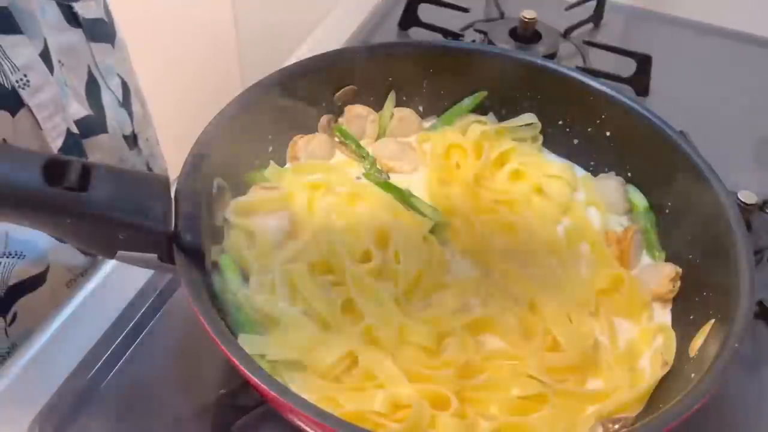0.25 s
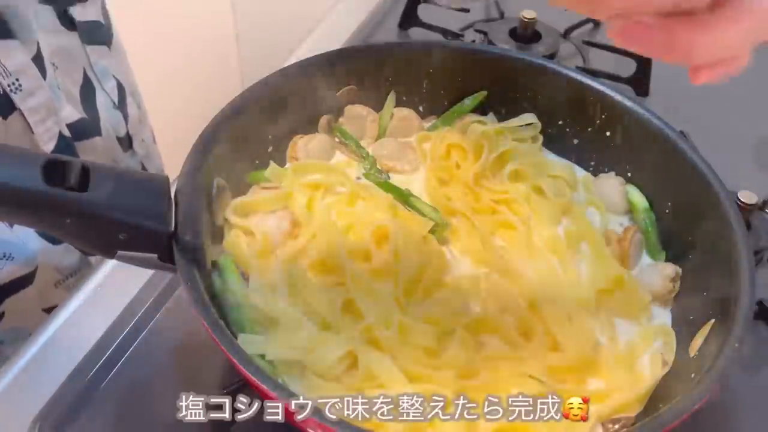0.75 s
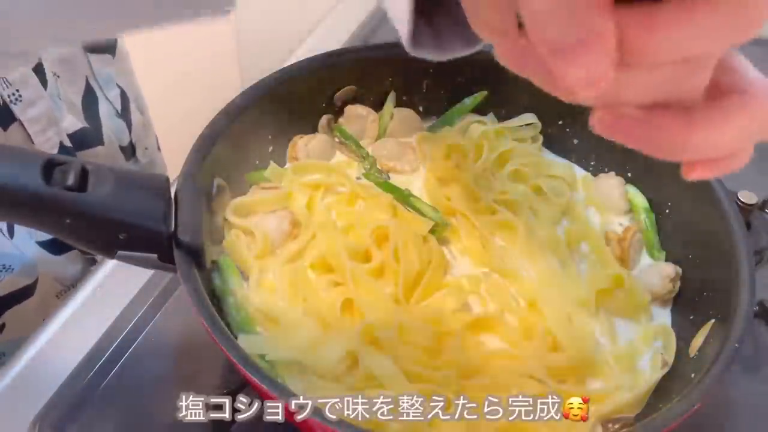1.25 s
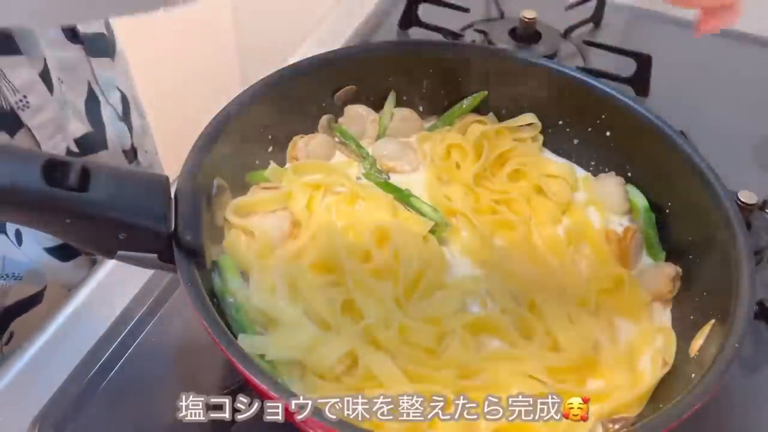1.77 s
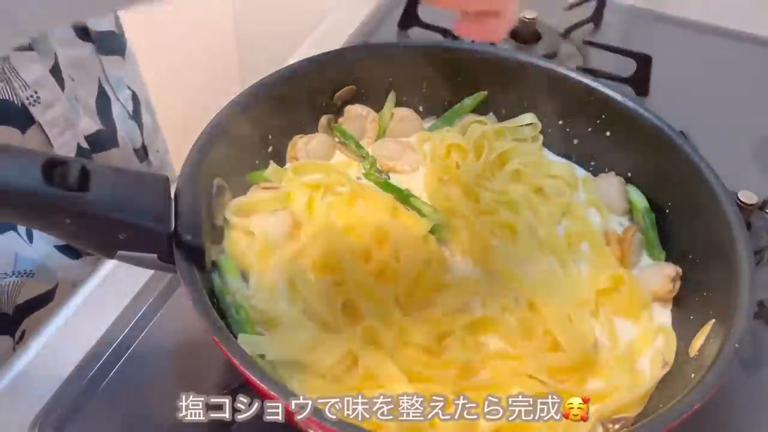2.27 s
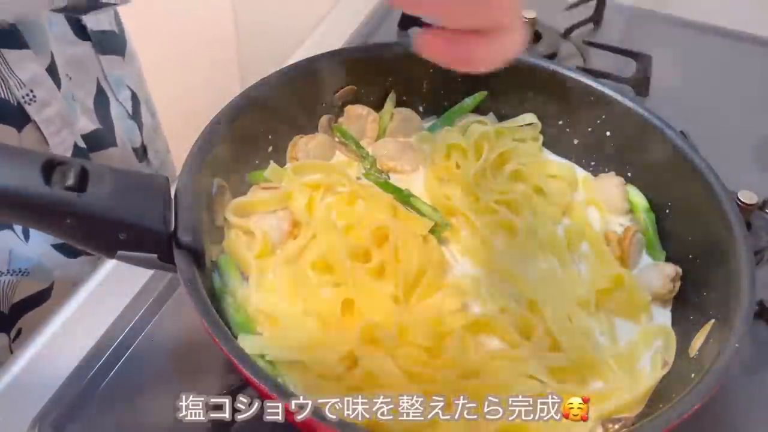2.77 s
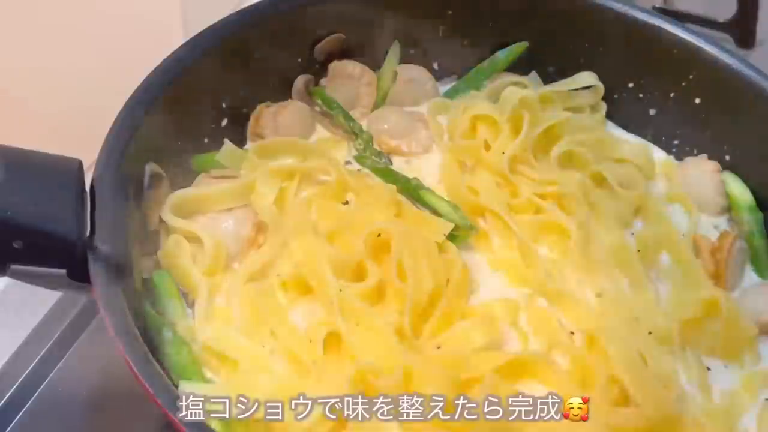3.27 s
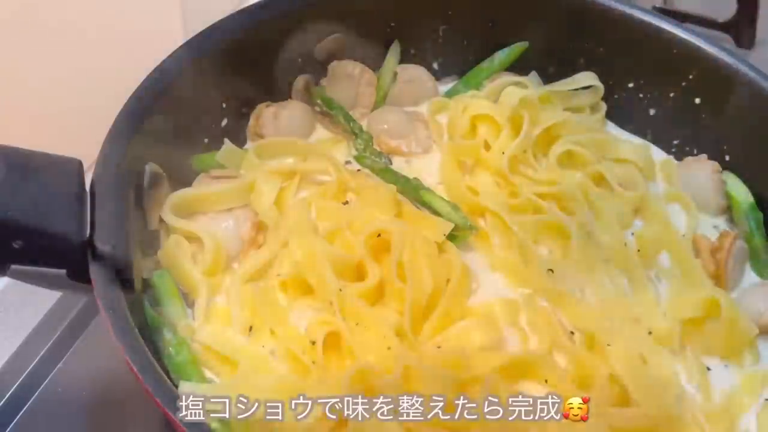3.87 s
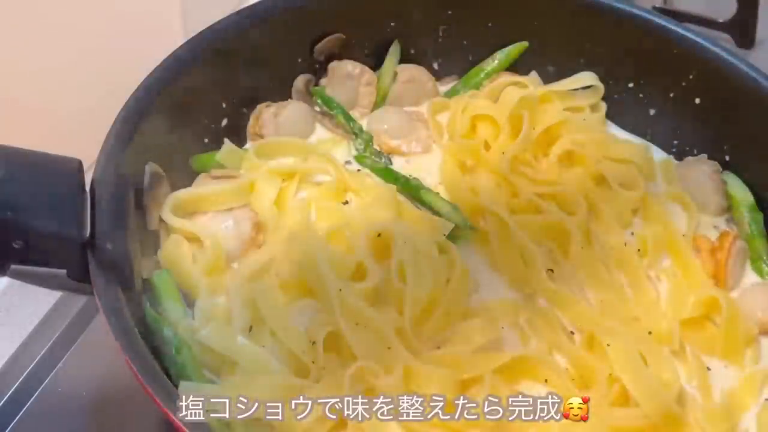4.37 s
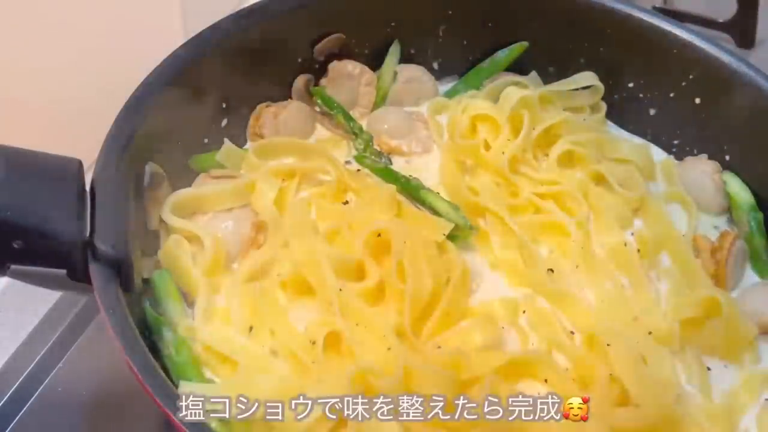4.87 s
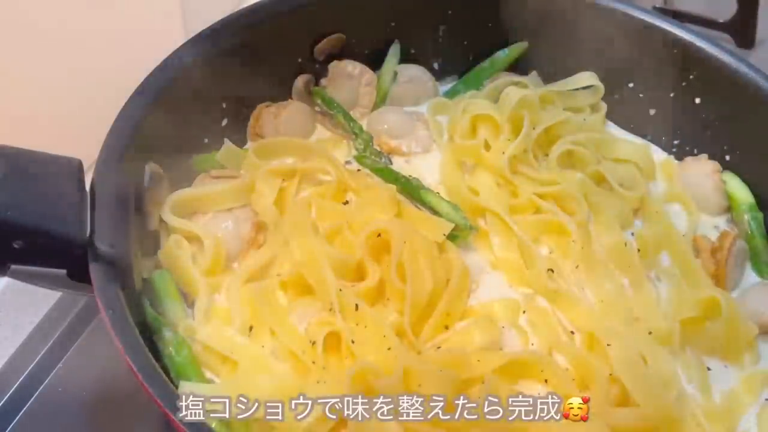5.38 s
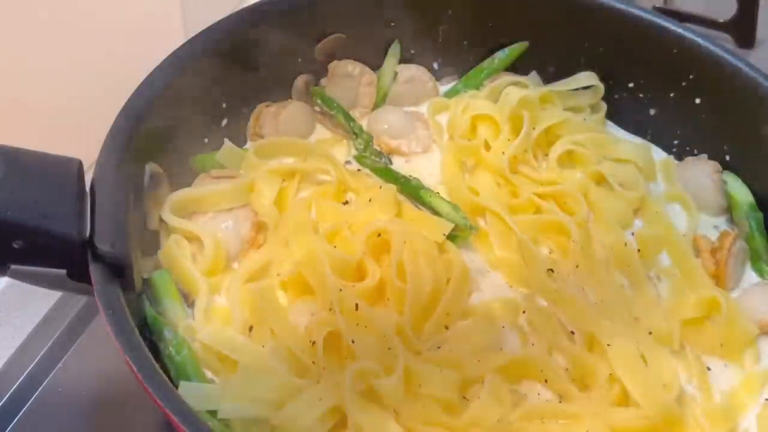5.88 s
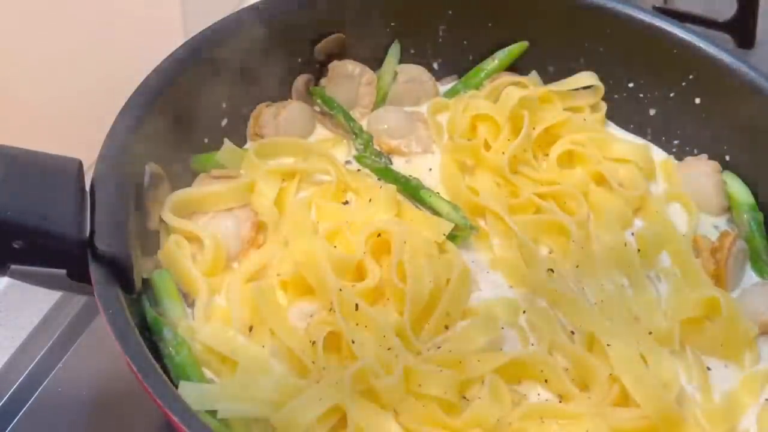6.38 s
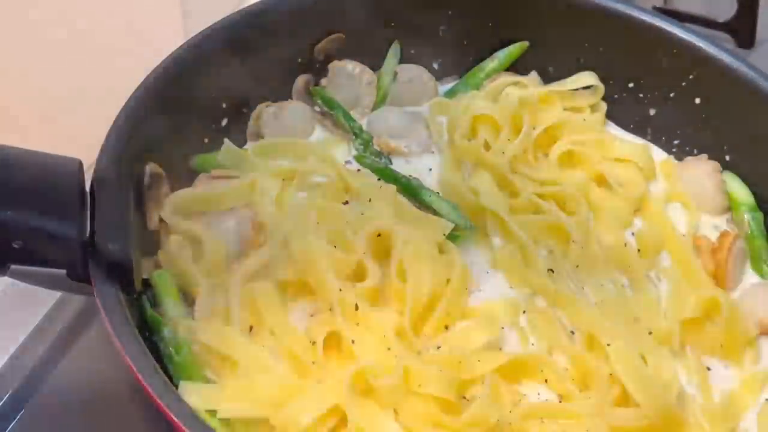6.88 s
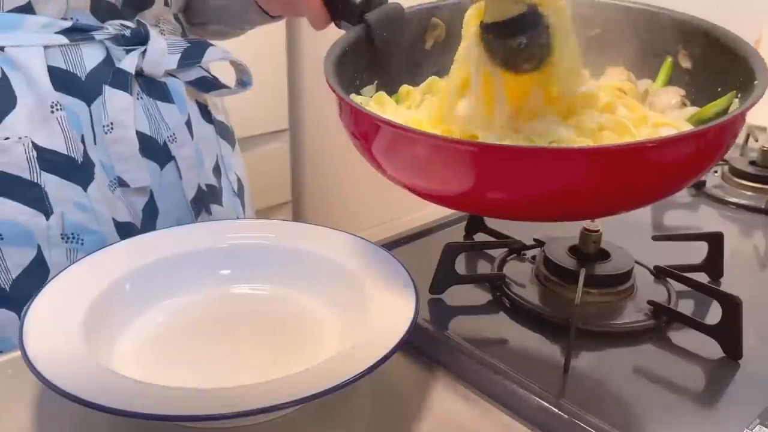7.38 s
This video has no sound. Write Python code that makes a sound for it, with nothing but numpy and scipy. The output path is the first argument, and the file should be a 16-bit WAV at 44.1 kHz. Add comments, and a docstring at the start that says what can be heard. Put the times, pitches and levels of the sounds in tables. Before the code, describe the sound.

Throughout, a kitchen hood rumbles low and steady with faint duct hum, over a soft sauce hiss. Close by, a salt mill crunches from 0 s: a fading scrape, sharp cracks at 0.3-0.45, then brittle twists near 0.8, 1.3, 1.8 and 2.25, each about a tenth of a second with a hollow ring, faint slack returns and trickling grains between. From about 2.7 a pepper mill takes over, with harder, woodier crackles at 2.75, 2.95, 3.25, 3.5, 3.75 and a strong pair around 4.0-4.1, then shorter snaps until 5.2 and weak ones to 5.8. Small wet pan ticks appear around 6. A dry hand rubs and knocks the mill at 6.2-6.6, with another rub rising at 6.9. At 6.96 it cuts abruptly to quieter hiss; at 7.1 pasta slides out with a short wet slosh, fading among tiny ticks. Short room reflections, close stereo.

```python
"""A small kitchen: a cook close by twists a salt mill, then a pepper mill, over a pan of pasta.
Grains crack and crumble between the burrs as noise bursts that ring the hollow mill and its wall.
A hood fan rumbles as shaped noise with two duct tones; the sauce hisses faintly and ticks.
A hand rubs over the mill, then a splice cuts to a quieter moment: pasta slides out of the sauce.
Levels in the tables are relative and come before the room and the two microphone ports."""
import sys
import numpy as np
from scipy import signal
from scipy.fft import rfft, irfft, next_fast_len
from scipy.io import wavfile
from scipy.ndimage import uniform_filter1d

SR = 44100
rng = np.random.default_rng(int(sys.argv[2]) if len(sys.argv) > 2 else 0)


def persist_wave(psi):
    """Save psi, clipped to +-1, as 16-bit WAV."""
    counts = np.round(np.clip(psi, -1, 1) * 32767).astype(np.int16)
    wavfile.write(sys.argv[1], SR, np.atleast_2d(counts).T)


N = 336924
STEP = 16  # samples between two readings of a slow control


def amp(db):
    """Amplitude factor of a level in dB."""
    return 10 ** (np.asarray(db) / 20)


def unit(x):
    """Scale to an rms of one."""
    return x / np.sqrt(np.mean(x ** 2) + 1e-20)


def along(points, hz):
    """Read (frequency [Hz], value) points on a log frequency axis."""
    f, v = np.transpose(points)
    return np.interp(np.log(hz + 1), np.log(f + 1), v)


def filtered(x, response):
    """Pass x through a complex response of frequency."""
    m = next_fast_len(N + SR // 2)
    return irfft(rfft(x, m) * response(np.fft.rfftfreq(m, 1 / SR)), m)[..., :N]


def modes(table):
    """Causal response of damped resonances, summed with alternating sign."""
    def response(f):
        total = 0
        for k, (centre, width, db) in enumerate(table):
            damping = 1j * f * width
            total = total + (-1) ** k * amp(db) * damping / (centre * centre - f * f + damping)
        return total
    return response


def shape(table):
    """Zero-phase response read from a spectrum."""
    return lambda f: amp(along(table, f))


def coloured(envelope, response):
    """Two unrelated noises under one envelope, through a response that keeps the rms."""
    gain = np.sqrt(np.mean(np.abs(response(np.linspace(1, SR / 2, num=4000))) ** 2))
    return filtered(envelope * rng.standard_normal((2, N)), response) / gain


def patchy(x, patchy_db):
    """Uneven colour: random gain in patches about 1.5 kHz wide and 10 ms long."""
    z = signal.stft(x, nperseg=128)[2]
    field = uniform_filter1d(rng.standard_normal(z.shape[1:]), size=4, axis=0)
    field = uniform_filter1d(field, size=6, axis=1)
    gain = amp(patchy_db * unit(field))
    return signal.istft(z * unit(gain), nperseg=128)[1][:, :N]


def bursts(power, t60, chatter_db, chatter_t60):
    """Power envelope of sudden releases: a sharp snap, then the fragments chatter on."""
    t = np.arange(SR // 10) / SR
    snap = amp(-120 * t / t60)  # 120, because this is power
    chatter = amp(2 * chatter_db - 120 * t / chatter_t60)
    return np.abs(signal.fftconvolve(power, snap + chatter)[:N])


def friction(rate, spread_db, smooth):
    """Power envelope of mean 1: random grains (rate per second) of uneven size over a smooth share."""
    sizes = amp(2 * spread_db * np.minimum(rng.exponential(size=N), 3))
    grains = (rng.random(N) < rate / SR) * sizes
    power = bursts(grains, 0.021, -9, 0.01)
    return (power / power.mean() + smooth) / (1 + smooth)


def strokes(tables):
    """Level per sample in dB, drawn through the points; silent outside the strokes."""
    t, level_db = np.arange(N) / SR, np.full(N, -200.)
    for rows in tables:
        s, db = np.transpose(rows)
        on = (t >= s[0]) & (t <= s[-1])
        level_db[on] = np.interp(t[on], s, db)
    return level_db


def swell(start, length, db, change_db, rise, fall):
    """Power per STEP that rises [dB/s] to the start, drifts, then falls [dB/s]; also the share done."""
    t = np.arange(0, N, STEP) / SR - start
    done = np.clip(t / length, 0, 1)
    rising = rise * np.minimum(t, 0)
    falling = fall * np.maximum(t - length, 0)
    return amp(2 * (db + change_db * done + rising - falling)), done


# rumble of the hood fan: (frequency [Hz], density [dB per Hz])
HOOD_SPECTRUM = [(15, -34.5), (30, -20.5), (60, 0.5), (130, -5.5), (300, -11), (550, -14.5), (1000, -27.5),
                 (2000, -56.5)]
# wavering tones of the fan duct: (frequency [Hz], width [Hz], level [dB])
DUCT_TONES = [(67.4, 15, 2), (231.6, 8, 9)]
# hiss of the sauce before the splice: (frequency [Hz], density [dB per Hz])
STEAM_SPECTRUM = [(300, 0.5), (800, 5), (1500, 1.5), (2500, -3), (5000, -9), (9000, -13.5), (13000, -12),
                  (16000, -23.5)]
# fainter hiss after the splice: (frequency [Hz], density [dB per Hz])
CALM_SPECTRUM = [(900, 0.5), (1600, -8), (3000, -9.5), (5500, -13), (12000, -8.5), (16000, -11)]


def hood_and_hiss(before):
    """Steady fan noise with narrow-band duct tones; the hiss is weaker and uneven after the splice."""
    rumble, tones = shape(HOOD_SPECTRUM), modes(DUCT_TONES)
    fan = coloured(amp(-58.5), lambda hz: np.hypot(rumble(hz), np.abs(tones(hz))))
    steam = coloured(amp(-66.5) * before, shape(STEAM_SPECTRUM))
    calm = coloured(amp(-76) * (1 - before), shape(CALM_SPECTRUM))
    return fan + steam + patchy(calm, patchy_db=3.5)


# decay of the room: (frequency [Hz], t60 [s])
ROOM_DECAY = [(500, 0.25), (2000, 0.33), (8000, 0.27), (16000, 0.17)]


def room_tail(x):
    """Each frequency of the room's answer dies at its own speed; a new tail for every third of a second."""
    out, step = np.zeros((2, N + SR)), SR // 3
    for i in range(0, N, step):
        hz, t, z = signal.stft(rng.standard_normal((2, SR // 3)), SR, nperseg=256)
        decay = amp(-60 * t / along(ROOM_DECAY, hz)[:, None])
        tail = signal.istft(z * decay, SR, nperseg=256)[1]
        wet = signal.fftconvolve(x[:, i:i + step], tail / np.linalg.norm(tail[0]), axes=1)
        out[:, i + 130:][:, :wet.shape[1]] += wet  # 130 samples: about 3 ms of delay
    return out[:, :N]


# small wet ticks in the pan: (time [s], relative level [dB], centre frequency [Hz])
PAN_TICKS = [(5.537, -44, 800), (5.9539, -46.5, 2400), (6.0152, -50, 11800), (6.0337, -52, 11860),
             (6.04, -42.5, 1390), (6.106, -50.5, 2290), (6.1419, -49, 2300), (6.196, -51, 1097),
             (6.793, -56, 2600), (6.877, -41, 800), (7.0808, -52, 2210), (7.19, -56, 6000),
             (7.284, -57.5, 3600), (7.3898, -60, 3990), (7.4083, -54.5, 3830), (7.425, -58, 6700),
             (7.45, -57, 13360), (7.4842, -60.5, 13100), (7.5176, -56.5, 4190)]
# pasta sliding out of the sauce: (time [s], level [dB])
PASTA_LIFT = [(7.095, -78), (7.112, -58.5), (7.16, -63), (7.3, -77), (7.55, -84), (7.63, -94)]
# wet slosh of the sliding pasta: (frequency [Hz], density [dB per Hz])
SLOSH_SPECTRUM = [(200, -6), (800, 1), (1600, -4.5), (2800, -14), (5000, -14.5), (11000, -7), (16000, -28)]


def pan():
    """Strands slide out of the sauce as noise; films of sauce burst as short damped band-noise ticks."""
    out, t = np.zeros((2, N + SR)), np.arange(SR // 12) / SR
    decay = amp(-60 * t / 0.0055) + 0.24 * amp(-60 * t / 0.17)
    for s, db, hz in PAN_TICKS:
        puff = rng.standard_normal((2, len(t))) * decay
        b, a = signal.butter(2, [hz * .8, hz * 1.25], "band", fs=SR)
        tick = amp(db + 5) * signal.lfilter(b, a, puff)
        out[:, round(s * SR):][:, :len(t)] += tick
    return out[:, :N] + coloured(amp(strokes([PASTA_LIFT])), shape(SLOSH_SPECTRUM))


# a hand rubbing the mill, one list per stroke: (time [s], level [dB])
HAND_RUBS = [
    [(6.21, -65), (6.24, -41.5), (6.262, -39.5), (6.277, -24.5), (6.33, -34), (6.348, -18.5), (6.365, -27),
     (6.4, -58), (6.47, -53)],
    [(6.478, -43), (6.545, -38.5), (6.563, -28), (6.6, -39), (6.65, -67), (6.72, -82)],
    [(6.8, -65.5), (6.886, -62), (6.93, -45.5), (6.96, -23.5)],
]
# the palm bumps the mill: (time [s], hollow ring level [dB])
PALM_KNOCKS = [(6.274, -25), (6.344, -32.5)]
RUB_AIR_DB = -27.5  # hollow ring share of the rubbing


def hand():
    """Skin slides in fine stick-slip grains; rubbing and bumps drive the hollow. Returns skin, air power."""
    rub = friction(2200, spread_db=12, smooth=0.68) * amp(2 * strokes(HAND_RUBS))
    bumps = sum(swell(s, 0.0033, db, 0, 3000, 1040)[0] for s, db in PALM_KNOCKS)
    return rub, rub * amp(2 * RUB_AIR_DB) + np.repeat(bumps, STEP)[:N]


# pushes of the wrist against the burrs:
# (start [s], length [s], grinding level [dB], change by the end [dB], hollow ring share at the end,
#  before the gain AIR_GROWS_DB is counted back [dB])
WRIST_PUSHES = [(0, 0.13, -38.5, -21.5, -13.5), (0.28, 0.055, -28.5, -8.5, -8),
                (0.366, 0.016, -20, -14, -7.5), (0.422, 0.018, -34, -6.5, -5.5),
                (0.816, 0.098, -28.5, -4.5, -8.5), (1.277, .13, -31, -7, -7.5),
                (1.766, .1, -31.5, -9, -8.5), (2.234, .16, -34, -3.5, -12), (2.729, 0.12, -30.5, -16, -7.5),
                (2.943, 0.06, -31, -8, -11.5), (3.24, 0.048, -42, 8, -11), (3.465, 0.11, -40, 0.5, -11),
                (3.752, 0.035, -39, 4, -7.5), (3.988, .042, -27.5, -8.5, -11),
                (4.088, 0.025, -22.5, -13, -4.5), (4.324, 0.016, -35.5, -11, -28.5),
                (4.416, 0.012, -35.5, -8, -28.5), (4.744, 0.054, -44.5, 4, -6),
                (4.884, 0.023, -46.5, -1, -3.5), (5.113, 0.055, -27, -17, -15.5),
                (5.375, .05, -48, 9.5, -5.5), (5.485, 0.026, -47.5, 1.5, -8), (5.715, .03, -55, -1, -8),
                (6.015, 0.019, -61.5, -10, -12)]
BITE_DB_PER_S, LET_GO_DB_PER_S = 2600, 398.5  # the burrs bite fast and let go slower
CREEP_DB, CREEP_DB_PER_S = -23, 299  # the burrs creep faintly just before they bite
AIR_GROWS_DB = 2  # the hollow ring gains on the grinding during a push
# slack turns back: (time [s], grinding level [dB])
SLACK_RETURNS = [(.7, -52), (1.14, -48), (1.65, -48.5), (2.12, -52), (2.6, -54), (3.681, -77)]
BACK_RISE_DB_PER_S, BACK_FALL_DB_PER_S, BACK_AIR_DB = 119, 186, -20.5
TRICKLE_S, TRICKLE_DB, TRICKLE_AIR_DB = .45, -61.5, -15  # loose salt trickles from then until the swap


def wrist(salt):
    """Power of the grinding and of its hollow ring: pushes, slack returns, trickling salt."""
    trickling = salt * (np.arange(N) > TRICKLE_S * SR)
    grind = amp(2 * TRICKLE_DB) * trickling[::STEP]
    air = grind * amp(2 * TRICKLE_AIR_DB)
    for s, length, db, change_db, air_db in WRIST_PUSHES:
        bite, done = swell(s, length, db, change_db, BITE_DB_PER_S, LET_GO_DB_PER_S)
        creep, _ = swell(s, .005, db + CREEP_DB, 0, CREEP_DB_PER_S, LET_GO_DB_PER_S)
        power = bite + creep
        grind = grind + power
        air = air + power * amp(2 * (air_db + AIR_GROWS_DB * (done - 1.0)))
    for s, db in SLACK_RETURNS:
        power, _ = swell(s, 0.0049, db, 0, BACK_RISE_DB_PER_S, BACK_FALL_DB_PER_S)
        grind = grind + power
        air = air + power * amp(2 * BACK_AIR_DB)
    return np.repeat(grind, STEP)[:N], np.repeat(air, STEP)[:N]


SWAP_S = 2.65  # the cook has changed from salt to pepper
# grains that break: (time [s], relative level [dB], relative hollow ring share [dB])
GRAIN_CRACKS = [(0.2417, -39, -51), (0.288, -20.5, -32), (0.2971, -8.5, -18.5), (0.314, -24.5, -16),
                (0.3683, -13.5, -7.5), (0.3799, -13.5, -19), (0.429, -11, -29), (0.4408, -7.5, -18.5),
                (0.705, -29, -45), (.7995, -39.5, -36), (.823, -11.5, -25), (0.8764, -11.5, -13),
                (.917, -13.5, -12), (1.1461, -28, -32), (1.275, -7, -17), (1.294, -15, -14),
                (1.308, -21, -7), (1.3259, -17.5, -5), (1.3427, -26, 1.5), (1.3501, -20.5, -2),
                (1.4047, -22.5, -31), (1.5619, -35.5, -31), (1.6436, -31.5, -57), (1.7658, -29, -17),
                (1.7795, -7.5, -24), (1.809, -14.5, -10), (2.232, -30, -26), (2.2648, -20, -26),
                (2.3005, -15.5, -40), (2.338, -20, -8), (2.3818, -14.5, -13), (2.5851, -36, -40),
                (2.6065, -32, -54), (2.7114, -33, -40), (2.7223, -18.5, -23), (2.7674, -22, -22),
                (2.9401, -9.5, -10), (2.9634, -19.5, -5.5), (2.996, -18, -15), (3.0066, -24.5, -1.5),
                (3.0168, -17, -10.5), (3.0254, -17, -19), (3.242, -33, 2), (3.272, -19.5, -16),
                (3.2889, -18.5, -14.5), (3.2965, -16.5, -17.5), (3.476, -21.5, -17), (3.4866, -20, -16),
                (3.5141, -14.5, -15), (3.533, -15, -15), (3.5436, -16.5, -12.5), (3.573, -18, -12),
                (3.5775, -14.5, -18), (3.5941, -11.5, -20), (3.649, -27, -14.5), (3.747, -26, -19),
                (3.7609, -29.5, -26), (3.7739, -16.5, -25), (3.7904, -28.5, -20), (3.9862, -4.5, -19),
                (3.999, -13.5, -31), (4.007, -12, -24), (4.015, -10, -7), (4.0828, -7, -12),
                (4.1118, -24.5, -22), (4.3234, -12.5, -12.5), (4.329, -14.5, -17), (4.384, -19, -16),
                (4.418, -12, -25.5), (4.426, -12, -20), (4.5672, -37.5, -4), (4.5874, -7, -25.5),
                (4.744, -33.5, -5), (4.7854, -22.5, -22), (4.7952, -9, -25), (4.8945, -23, -14.5),
                (5.0975, -22, -13), (5.113, -11, -33), (5.118, -11.5, -21), (5.1289, -11, -14),
                (5.1397, -15.5, -13.5), (5.1572, -23.5, -17.5), (5.1714, -27, -8), (5.2067, -32, -14),
                (5.377, -37, -36), (5.401, -43, -21), (5.4219, -18.5, -18), (5.494, -32, -16),
                (5.7383, -34, -20), (5.772, -39, -8.5), (5.811, -39.5, -31), (5.8403, -34, -34),
                (6.2366, -40, -20), (6.49, -29.5, -40), (6.916, -32.5, -35), (6.9338, -37, -37),
                (6.945, -31, -39), (6.957, -27, -35)]
WALL_DB, WALL_FOLLOWS = -3.5, 0.44  # wall ring share; it follows the hollow ring share by this factor
PEPPER_WALL_DB = 2.5  # peppercorns ring the wall harder


def cracks():
    """Each grain snaps, then its fragments chatter. Returns the power of grit, hollow ring and wall ring."""
    s, db, air_db = np.transpose(GRAIN_CRACKS)

    def blows(level_db):
        return np.bincount((s * SR).astype(int), amp(2 * level_db), N)

    wall_db = db + WALL_DB + WALL_FOLLOWS * air_db + PEPPER_WALL_DB * (s > SWAP_S)
    grit = bursts(blows(db + 0.5), 0.005, -8, 0.023)
    air = bursts(blows(db + air_db + 2.5), 0.0025, -5, 0.02)
    wall = bursts(blows(wall_db), 0.003, -6, 0.038)
    return grit, air, wall


# brittle fracture: (frequency [Hz], density [dB per Hz])
GRIT_SPECTRUM = [(300, -29.5), (1000, -25.5), (2500, -7), (5500, -8.5), (7300, -2.5), (10000, 0),
                 (12800, -4.5), (15600, -10.5), (16200, -35), (17000, -53.5)]
# sliding skin: (frequency [Hz], density [dB per Hz])
SKIN_SPECTRUM = [(1200, -22.5), (2300, -19.5), (3000, -8.5), (7000, -4.5), (12500, -0.5), (16300, -21)]
# air inside the salt mill: (frequency [Hz], width [Hz], level [dB])
SALT_MILL_AIR = [(1336, 89, 5.5), (728, 250, -14.5), (314, 127, -12.5)]
# air inside the pepper mill: (frequency [Hz], width [Hz], level [dB])
PEPPER_MILL_AIR = [(1390, 364, 4.5), (2214, 370, -1)]
# wall of the mill: (frequency [Hz], width [Hz], level [dB])
MILL_WALL = [(2330, 1300, -13.5), (3636, 750, 10.5)]
# worktop shaken by the effort: (frequency [Hz], width [Hz], level [dB])
WORKTOP = [(70, 60, 0)]


def mill():
    """Crumbling, snapping and rubbing ring the air and the wall of the mill."""
    salt = np.arange(N) < SWAP_S * SR
    turn, turn_air = wrist(salt)
    crumbs = friction(560, spread_db=7.0, smooth=0.17)
    crumble = crumbs * turn
    skin, hand_air = hand()
    crack_grit, crack_air, crack_wall = cracks()
    air = np.sqrt(crumbs * turn_air + hand_air + crack_air)
    wall = crumble * amp(2 * np.where(salt, -9, -5)) + crack_wall
    effort = np.sqrt(turn) * amp(np.where(salt, -28, -36))

    grains = patchy(coloured(np.sqrt(crumble + crack_grit), shape(GRIT_SPECTRUM)), patchy_db=2.5)
    rubbing = coloured(np.sqrt(skin), shape(SKIN_SPECTRUM))
    salt_ring = coloured(air * salt, modes(SALT_MILL_AIR))
    pepper_ring = coloured(air * ~salt, modes(PEPPER_MILL_AIR))
    shake = coloured(effort, modes(WORKTOP))
    wall_ring = coloured(np.sqrt(wall), modes(MILL_WALL))
    return grains + rubbing + salt_ring + pepper_ring + shake + wall_ring


SPLICE_S, ROOM_DB = 6.96, -10


def scene():
    """The mill and its room fade out at the splice; the fan and the pan play across it."""
    before = np.clip(1 - (np.arange(N) / SR - SPLICE_S) / 0.015, 0, 1)  # 15 ms cross-fade
    near = mill() * before
    mill_in_room = (near + amp(ROOM_DB) * room_tail(near)) * before
    return hood_and_hiss(before) + pan() + mill_in_room


# likeness of the two microphone ports: (frequency [Hz], correlation)
PORT_LIKENESS = [(60, 0.93), (160, 0.91), (300, .7), (600, 0.27), (1400, 0.53), (3500, 0.26), (6500, 0.24),
                 (7600, 0.97), (16000, 1)]
# phase by which the left port leads: (frequency [Hz], lead [rad])
PORT_LEAD = [(0, 0), (1700, -.3), (2000, .5), (3800, 1.3), (5200, .4), (5800, -1.5), (7000, -1.9),
             (7700, -2.9), (9000, -3.3), (12000, -5.3), (13200, -6.2), (16500, -6.5)]
# balance of the ports: (frequency [Hz], left minus right [dB])
PORT_LEAN = [(60, 1.3), (200, .8), (400, 1.5), (700, 1.5), (1300, 5), (2000, 2), (3700, 4), (5000, 2.5),
             (7000, 3.5), (8500, 0), (15000, 0)]
TOP_HZ = 16900  # band limit


def record(dry):
    """Two ports share part of the sound, each with its own phase and level, up to the band limit."""
    def share(hz):
        angle = np.arccos(np.clip(along(PORT_LIKENESS, hz), -1, 1)) / 2
        return np.array([np.cos(angle), np.sin(angle)])

    def ports(hz):
        lead = np.interp(hz, *np.transpose(PORT_LEAD))
        left = amp(along(PORT_LEAN, hz) / 2) * np.exp(.5j * lead)
        return np.array([left, 1 / left])

    shared, apart = filtered(dry, share)
    pair = filtered(np.array([shared + apart, shared - apart]), ports)
    pair = pair / (1 + np.abs(pair / .8) ** 4) ** (1 / 4)  # the input stage rounds the highest peaks
    return filtered(pair, lambda hz: np.clip((TOP_HZ - hz) / 500, 0, 1) ** 2)


dry = scene()
out = record(dry)
persist_wave(out)
```